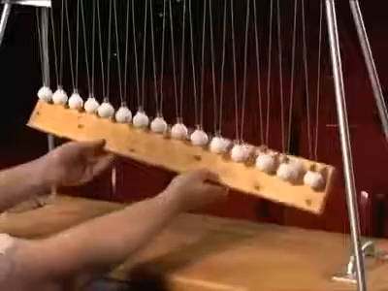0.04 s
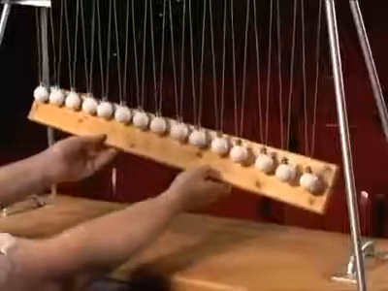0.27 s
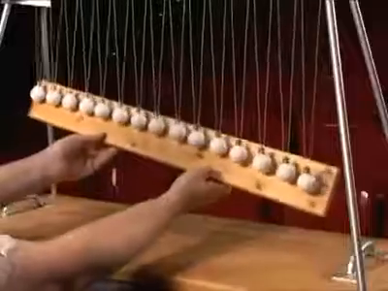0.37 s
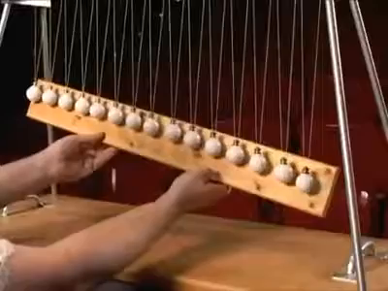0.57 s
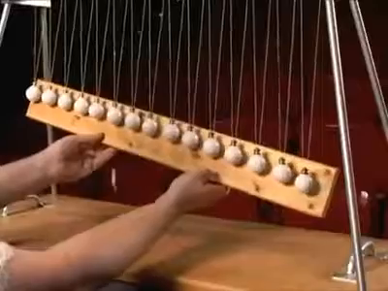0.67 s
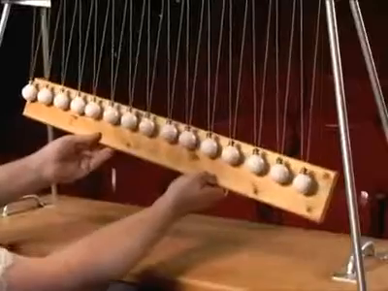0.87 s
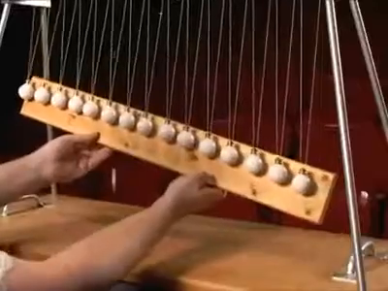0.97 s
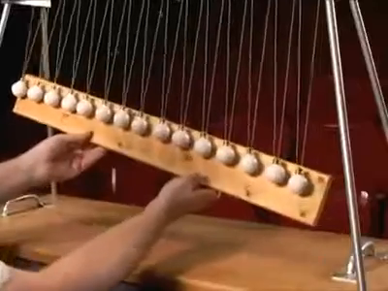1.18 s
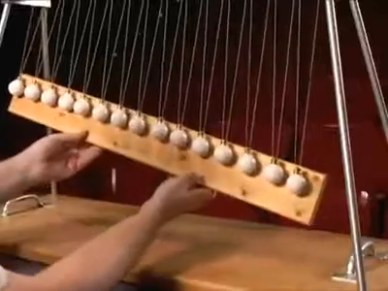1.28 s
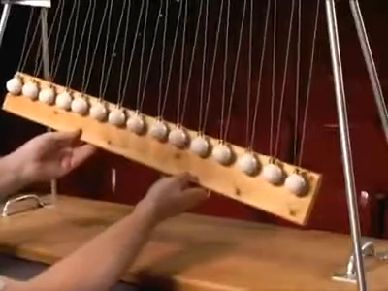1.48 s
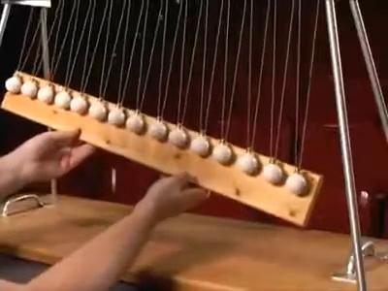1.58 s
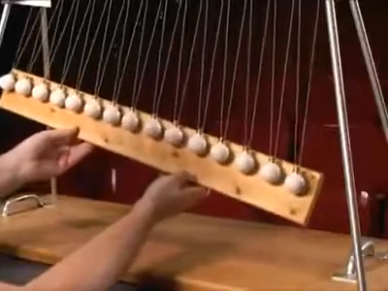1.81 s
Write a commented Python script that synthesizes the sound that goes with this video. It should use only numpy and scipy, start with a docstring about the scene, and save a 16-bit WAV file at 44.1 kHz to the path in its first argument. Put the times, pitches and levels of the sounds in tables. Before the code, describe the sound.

Hanging balls knock against a long wooden board pushed into them, in a quick, irregular flurry of hollow taps that thins out and stops. A couple of faint ticks follow in a quiet, slightly echoing hall, heard on the right.

```python
"""Hanging balls knocking on a board

A long wooden board is pushed against a row of hanging balls, which knock on it in an uneven flurry
and settle. Each knock thuds and excites the bending modes according to its place and hardness.
A bench reflects the sound and a hall prolongs it. The microphone feeds the right channel, with
faint ticks, mains hum and room noise; the left holds only amplifier hiss."""
import sys
import numpy as np
from scipy import signal
from scipy.fft import rfft, irfft
from scipy.io import wavfile
from scipy.ndimage import uniform_filter1d

SR = 44100
rng = np.random.default_rng(int(sys.argv[2]) if len(sys.argv) > 2 else 0)


def transcribe(u):
    """Save the signal u as a 16-bit wav file named by the first command-line argument.

    u: samples, shape (n,) or (channels, n), limited to [-1, 1]; the rate is SR.
    q: integer samples, one column per channel.
    """
    v = np.clip(np.atleast_2d(u).T, -1, 1)
    q = np.round(v * 32767).astype(np.int16)
    wavfile.write(sys.argv[1], SR, q)


N = 81585

# room rumble and hiss, right channel: f/Hz, relative spectral level/dB
ROOM_SPECTRUM = [(15, 8), (30, -1.5), (50, -10), (90, 7), (200, -1.5), (400, -5.5), (800, -11.5),
                 (2000, -18), (5000, -20.5), (10000, -24.5)]
# amplifier hiss, left channel: f/Hz, relative spectral level/dB
AMPLIFIER_SPECTRUM = [(15, -2.5), (30, 11), (55, -3.5), (130, -7), (300, -14), (1000, -18), (3000, -19.5),
                      (10000, -20.5)]
# tones of the mains hum: f/Hz, rms level/dB
HUM_TONES = [(150.2, -47.5), (87, -67.5), (307, -67.5)]
# reverberation time of the hall: f/Hz, T60/s
HALL_DECAY = [(200, 1), (550, 0.24), (1000, 1), (1600, 1), (2500, 0.45), (5000, 0.532), (10000, 0.334)]
# faint ticks: t/s, level/dB
TICK_EVENTS = [(0.222, -40), (1.49, -56), (1.68, -58.5)]
# dull thud of ball on wood: f/Hz, relative spectral level/dB
THUD_SPECTRUM = [(100, -10), (300, -4), (500, -1.5), (800, 2.5), (1300, -2.5), (2000, -4.5), (3000, -14),
                 (6000, -22), (10000, -41.5)]
# bending modes of the board, ascending: f/Hz, relative level/dB, T60/s, gain into the hall/dB
BENDING_MODES = [(538, -6.5, 0.11, -5.5), (1031, 1.5, 0.098, -7), (1605.8, 6.5, 0.053, -11.5),
                 (2352, 3, 0.034, -18), (3179, 2.5, .028, -16.5), (4035, -2.5, 0.022, -19),
                 (4910, -3, 0.016, -21.5), (5740, -5, 0.02, -20), (7700, -14, 0.013, -17.5),
                 (9660, -4, 0.014, -17)]
# knocks on the board: t/s, relative level/dB, place along the board (0-1), contact cutoff f/Hz, factor on modal
# T60
KNOCKS = [(0.1945, -35, 0.29, 1430, 1), (0.2287, -23.5, 0.2, 2220, 1.09), (0.2555, -12.5, .135, 2050, 0.94),
          (0.2803, -27, 0.22, 3170, 0.54), (0.3022, -24, .378, 2580, 0.96), (0.3225, -21, 0.28, 2860, 0.71),
          (0.3312, -30, .44, 3200, 0.92), (0.352, -44.5, .28, 1780, 0.44),
          (0.3595, -28.5, 0.15, 1946, 0.43), (0.3717, -20.5, 0.16, 2530, 0.59),
          (0.413, -30.5, 0, 2000, 0.7), (0.4395, -47, .48, 2000, 0.27), (0.4495, -24, 0.2, 1900, 0.56),
          (0.4757, -25, .392, 2340, 0.88), (0.502, -21.5, 0.28, 2820, 1.41),
          (0.5362, -12.5, 0.08, 3200, 0.75), (0.587, -55, 0, 1680, 1.04), (0.609, -32.5, .37, 3100, 0.35),
          (0.6225, -26, 0.19, 3390, 0.82), (0.6762, -19.5, .482, 3700, 0.61),
          (0.715, -29.5, .31, 1870, 1.13), (0.7615, -37, .48, 1880, 2.7), (0.8063, -22, 0.09, 2790, 0.74),
          (0.8295, -24, 0.43, 1670, 0.5), (0.9212, -32.5, .385, 3080, 0.76),
          (0.9675, -43.5, .33, 3000, 0.79), (0.998, -47, .49, 2600, 0.66)]


def undb(db):
    """Amplitude ratio of a level in decibels."""
    return 10 ** (np.asarray(db) / 20)


def at_hz(points, hz):
    """Interpolation of (f/Hz, value) points on a logarithmic frequency axis."""
    f, value = np.array(points, float).T
    return np.interp(np.log(hz + 1), np.log(f), value)


def fade(t, t60):
    """Exponential damping, 60 dB down after t60."""
    return np.exp(-np.log(1000) * t / t60)


def lowpass(x, hz):
    """Two-pole Butterworth low-pass."""
    return signal.lfilter(*signal.butter(2, min(hz, SR / 2 - 1), fs=SR), x)


def add(track, start_s, sound):
    """Linear superposition of a sound on a track."""
    i = int(start_s * SR)
    track[i:i + len(sound)] += sound[:N - i]


def noise(spectrum):
    """Spectral shaping of white noise, normalised to unit rms."""
    white = rfft(rng.standard_normal(N))
    x = irfft(white * undb(at_hz(spectrum, np.fft.rfftfreq(N, 1 / SR))), N)
    return x / x.std()


def mains_hum():
    """Superposition of steady sinusoids in random phase."""
    t = np.arange(N) / SR
    return sum(np.sqrt(2) * undb(db) * np.sin(2 * np.pi * (hz * t + rng.random()))
               for hz, db in HUM_TONES)


def hall_reverberation(sent, delay_s=.012, build_s=.012):
    """Diffuse field: dense reflections build up, then decay exponentially, octave by octave."""
    t, f = np.arange(N) / SR, np.fft.rfftfreq(N, 1 / SR)
    white, tail = rfft(rng.standard_normal(N)), 0
    build_up = 1 - np.exp(-np.maximum(t - delay_s, 0) / build_s)
    octaves_hz = 100 * 2. ** np.arange(8)
    for hz, share in zip(octaves_hz, np.eye(8)):
        band = irfft(white * at_hz(np.c_[octaves_hz, share], f), N)
        tail += band * build_up * fade(t, at_hz(HALL_DECAY, hz))
    spectrum = rfft(tail)
    smoothed_power = uniform_filter1d(abs(spectrum) ** 2, size=40)
    response = irfft(spectrum / np.sqrt(smoothed_power), N)  # unit energy, even across frequency
    return signal.fftconvolve(sent, response[:N * 3 // 4])[:N]


def bench_reflection(direct, delay_s=.00875):
    """Specular reflection: the bench returns each knock once, weaker and duller."""
    out = np.zeros(N)
    add(out, delay_s, undb(-10.5) * lowpass(direct, hz=5000))
    return out


def ticks(centre_hz=2540, width_hz=450):
    """Damped narrow-band noise: thin ticks, as of swinging balls grazing each other."""
    t, out = np.arange(SR // 8) / SR, np.zeros(N)
    resonator = signal.iirpeak(centre_hz, centre_hz / width_hz, SR)
    for start, db in TICK_EVENTS:
        ring = signal.lfilter(*resonator, rng.standard_normal(len(t)))
        add(out, start, ring / ring.std() * fade(t, t60=.086) * undb(db))
    return out


def contact_thud(t, thud_noise, rise, cutoff_hz, knock_db):
    """Onset transient: a noise burst whose bandwidth grows with the hardness of the contact."""
    burst = np.roll(thud_noise, rng.integers(N))[:len(t)] * rise * fade(t, t60=.025)
    typical_db, growth = -21.5, .87  # growth below 1: light knocks have more thud for their ring
    level_db = typical_db + growth * (knock_db - typical_db) + 6
    return lowpass(burst, cutoff_hz) * undb(level_db)


def struck_board(knocks):
    """Modal superposition: a knock excites each mode according to the mode's motion at that place."""
    t = np.arange(SR // 3) / SR
    hz, mode_db, t60, hall_db = np.array(BENDING_MODES).T
    index = np.arange(len(hz))
    # neighbouring modes reach the microphone in opposite phase
    tones = (-1) ** index[:, None] * np.sin(2 * np.pi * hz[:, None] * t)
    half_waves = index + 2.5
    node_fill = .27  # a ball is wide, so it drives a mode a little even at a node
    rise_cycles = 2.4  # in periods of the contact cutoff: soft knocks start slowly
    direct, sent, thud_noise = np.zeros(N), np.zeros(N), noise(THUD_SPECTRUM)
    for start, knock_db, place, cutoff_hz, t60_factor in knocks:
        mode_shape = np.cos(np.pi * half_waves * place + np.pi / 4)
        force_spectrum = (1 + (hz / cutoff_hz) ** 6) ** -.5
        gain = np.hypot(mode_shape, node_fill) * force_spectrum * undb(mode_db + knock_db + 6.5)
        rise = 1 - np.exp(-(t * cutoff_hz / rise_cycles) ** 2)
        rings = tones * rise * fade(t, t60_factor * t60[:, None])
        thud = contact_thud(t, thud_noise, rise, cutoff_hz, knock_db)
        add(direct, start, gain @ rings + thud)
        add(sent, start, (gain * undb(hall_db)) @ rings + undb(-4.5) * lowpass(thud, hz=1500))
    radiation = signal.butter(2, 260, "high", fs=SR)  # the narrow board radiates little bass
    return signal.lfilter(*radiation, [direct, sent])


def scene():
    """Superposition of direct sound, reflections and background on the right; hiss on the left."""
    direct, sent_to_hall = struck_board(KNOCKS)
    right = direct + bench_reflection(direct) + hall_reverberation(sent_to_hall)
    right += ticks() + mains_hum() + undb(-53) * noise(ROOM_SPECTRUM)
    left = undb(-59) * noise(AMPLIFIER_SPECTRUM)
    return np.array([left, right])


def record(dry):
    """Clipping at full scale, then band limiting by a steep low-pass."""
    top_hz = 10300
    band_limit = signal.ellip(12, .1, 80, top_hz, fs=SR, output="sos")
    return signal.sosfilt(band_limit, np.clip(dry, -1, 1))


dry = scene()
out = record(dry)
transcribe(out)
```